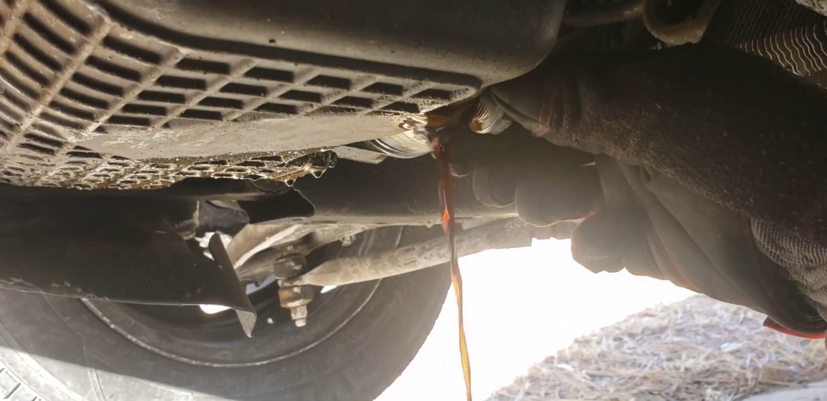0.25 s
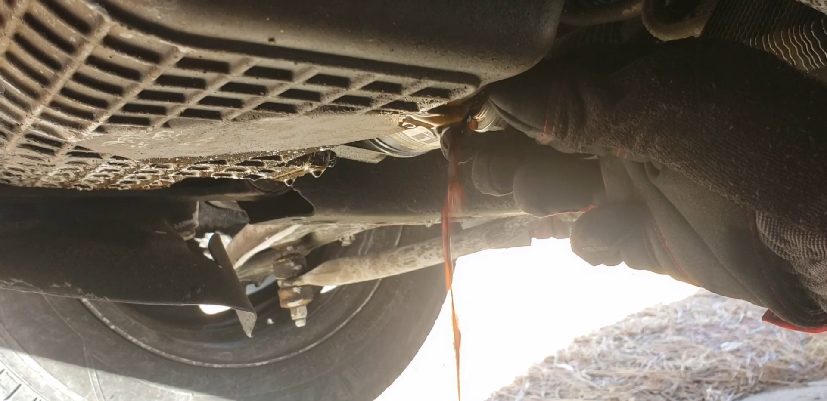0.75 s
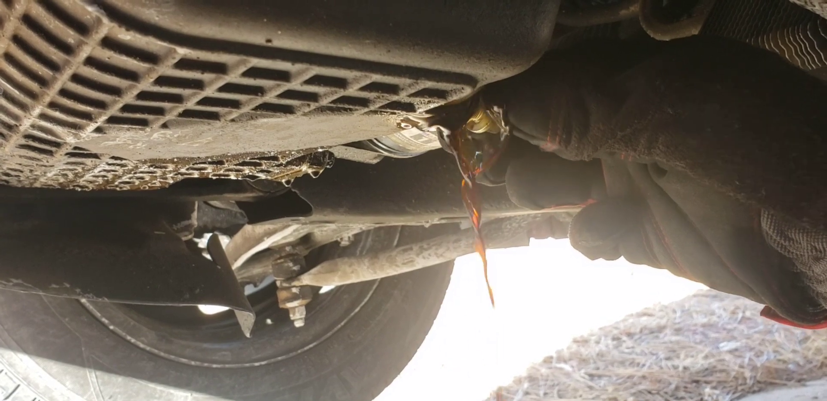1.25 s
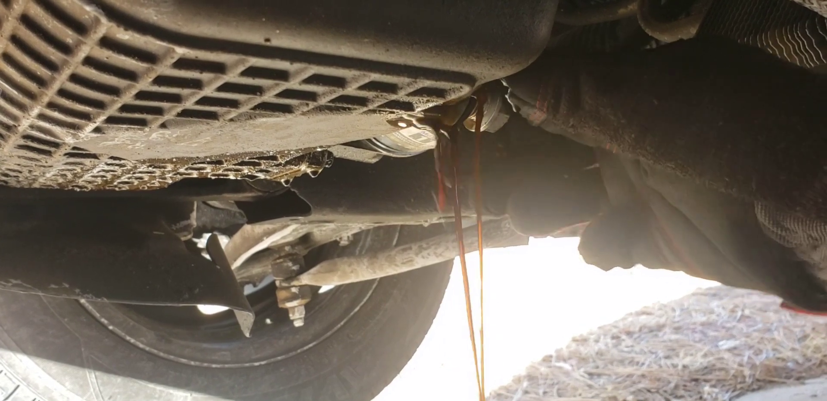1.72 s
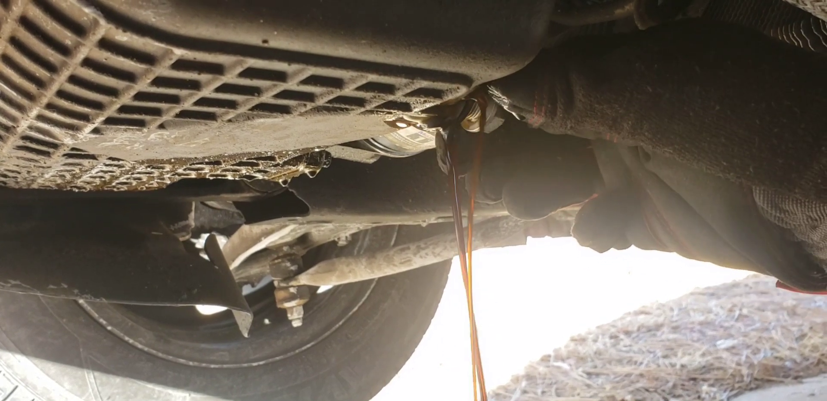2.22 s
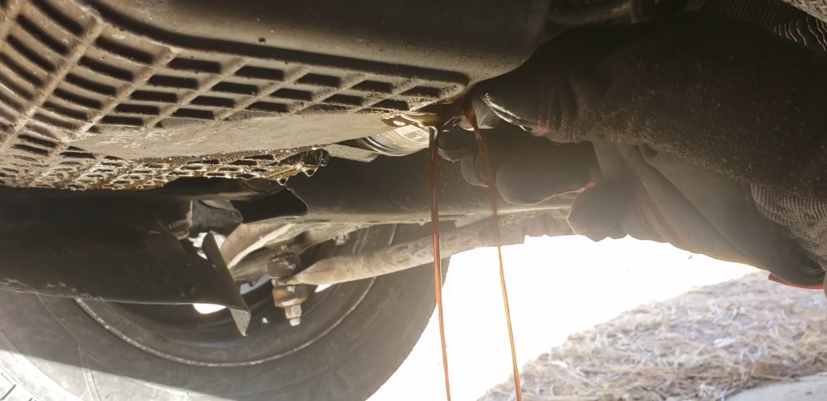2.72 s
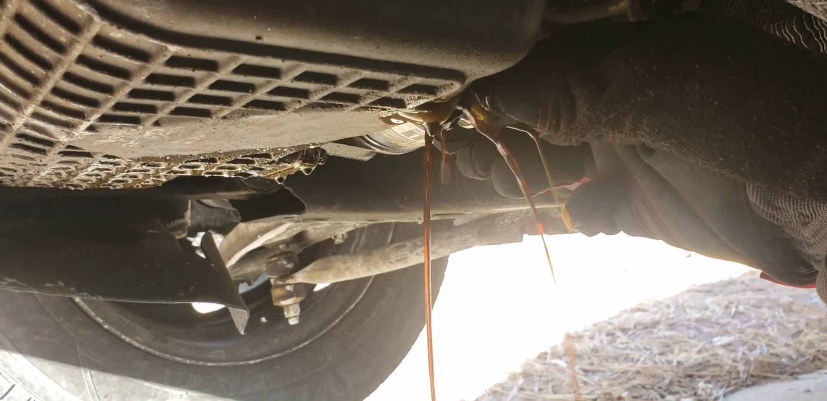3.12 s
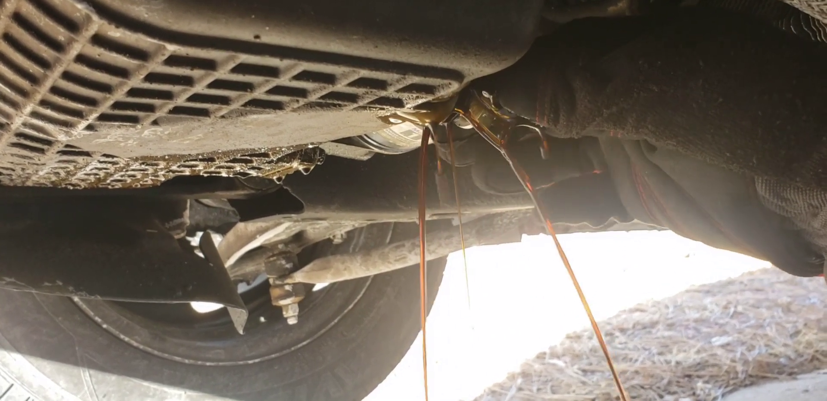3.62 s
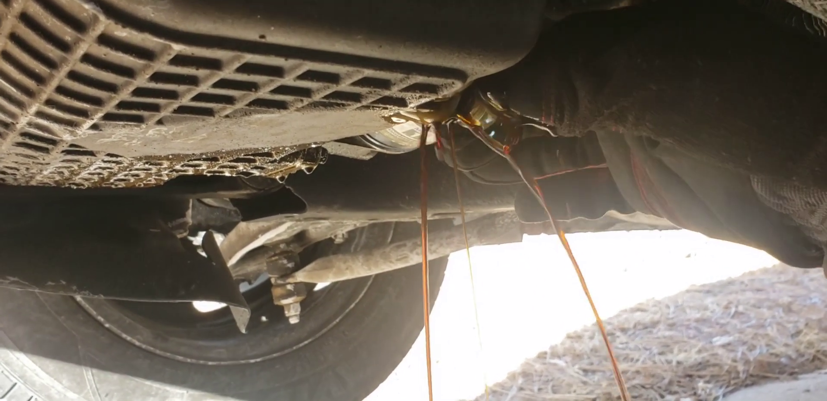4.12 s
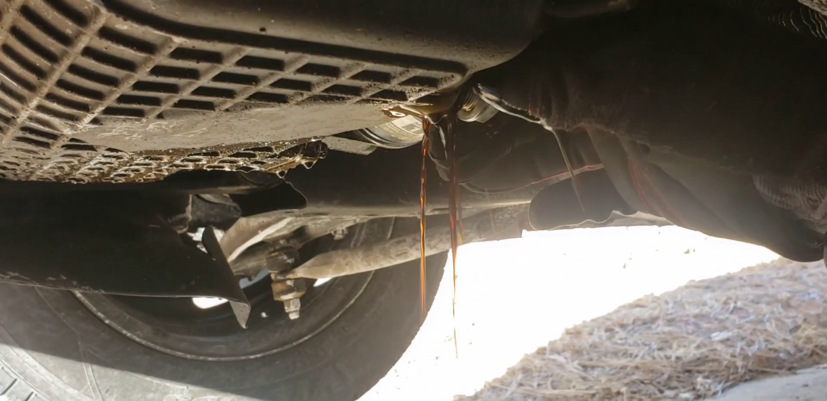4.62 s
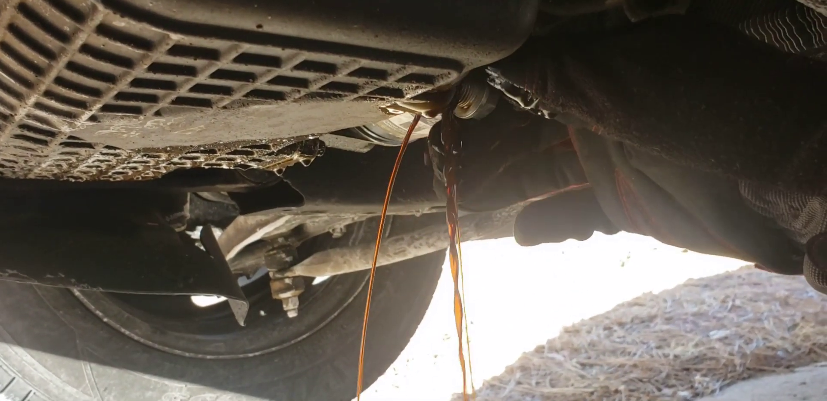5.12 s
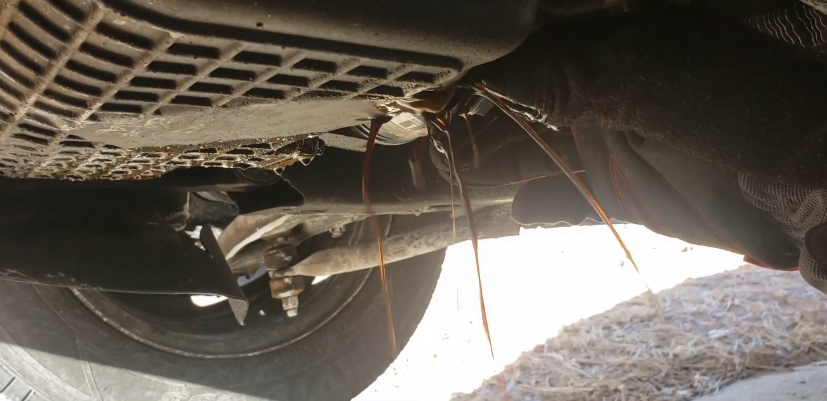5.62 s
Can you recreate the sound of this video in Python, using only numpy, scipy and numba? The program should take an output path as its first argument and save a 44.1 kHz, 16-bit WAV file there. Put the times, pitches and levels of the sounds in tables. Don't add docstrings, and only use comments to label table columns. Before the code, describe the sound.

Bright, ticking splats of draining oil patter into a hollow plastic tray, with low wind buffeting loud at first, softer afterward.

```python
import sys
import numpy as np
from scipy import signal
from scipy.io import wavfile
from scipy.ndimage import uniform_filter1d
from numba import njit

SR = 44100
rng = np.random.default_rng(int(sys.argv[2]) if len(sys.argv) > 2 else 0)


def to_wav(s):
    ch = np.atleast_2d(s).T
    pcm = np.round(np.clip(ch, -1, 1) * 32767)
    wavfile.write(sys.argv[1], SR, pcm.astype(np.int16))


def rack_gain(trim_db):
    fader = np.asarray(trim_db, float)
    return 10 ** (fader / 20)


N = 258101

# (time [s], fine spray [dB], drumming on tray [dB], lean toward tray's hollow [dB],
# left minus right [dB])
FLOW = [(0.0, -50.5, -57.5, -7.5, -9), (0.5, -56, -59.5, -12, -6), (0.72, -52, -64, -2.5, -4),
        (0.91, -55, -57.5, -5.5, -6), (1.4, -55, -70.5, -3, -4), (1.79, -62, -71.5, -2, 0),
        (2.57, -61, -63.5, -3.5, -2.5), (3.19, -58, -65, -19, 0.5), (3.55, -58.5, -64, -2, 1),
        (3.75, -58, -71, 4.5, -2), (4.05, -57, -61, 0.5, -1), (4.22, -56, -60, -4.5, 0.5),
        (4.52, -56.5, -64, -4, 0), (4.8, -56, -69.5, 3, 0.5), (5.3, -56, -63.5, -7.5, -1.5),
        (5.85, -59, -66.5, 3.5, -1)]
# (time [s], peak [dB], centre [Hz], bright crack [dB])
BRIGHT_SPLATS = [(0.0618, -34, 12300, -6), (0.4242, -31, 10500, -10), (0.5157, -32, 13400, -5),
                 (0.5457, -31, 14000, -2), (0.6194, -23.5, 15900, -11), (0.76, -30.5, 12200, -12),
                 (0.9776, -33, 10100, -7), (1.1202, -28.5, 12700, -17), (1.1575, -24, 14900, -10.5),
                 (1.3613, -30, 11500, -4.5), (1.388, -23.5, 13500, -10), (1.568, -35, 10600, -6),
                 (1.644, -32.5, 11700, -4), (1.887, -25.5, 16000, -18.5), (2.091, -36, 12700, -5),
                 (2.2998, -35.5, 11900, 2.5), (3.22, -29, 12150, -14), (3.4504, -33.5, 11800, -2.5),
                 (3.695, -26.5, 13800, -23), (4.0075, -31, 12000, -12), (4.296, -31.5, 11800, 2),
                 (4.3938, -34.5, 10600, -1), (4.6007, -24.5, 10300, -12), (4.812, -33, 13000, -4),
                 (4.913, -27.5, 14000, -9), (4.9528, -28, 11500, -12), (5.4141, -31.5, 8560, -14),
                 (5.477, -26.5, 11900, -4), (5.6478, -20, 14500, -11), (5.747, -36, 13900, 1)]
# (time [s], peak [dB], centre [Hz], bright crack [dB])
FAT_SPLATS = [(0.183, -46, 6400, -22), (0.4574, -38.5, 4280, -12), (0.5847, -41.5, 6120, -5),
              (0.6365, -32, 6260, -13), (0.7072, -35.5, 5460, -3), (0.9915, -32.5, 4530, -17),
              (1.0914, -32.5, 3840, -39), (1.2758, -39.5, 5570, -6), (1.45, -42.5, 6000, 2),
              (1.5207, -43.5, 7000, -4), (1.6001, -37.5, 4840, -21), (1.6914, -42, 5070, -5),
              (1.719, -42, 4200, -11), (1.9949, -37.5, 7100, -18), (2.2207, -42, 7550, -9),
              (2.4902, -44.5, 7950, -5), (2.6953, -42, 6100, -12), (2.7429, -40.5, 4860, -8),
              (3.1063, -47.5, 7940, -9), (3.1991, -47.5, 7000, -1), (3.8062, -46.5, 6900, -5),
              (3.8616, -45.5, 5300, -5), (3.893, -41, 3480, -14), (4.12, -42, 7300, -8),
              (4.145, -45, 8860, -7), (4.201, -62, 8500, -14), (4.78, -53.5, 3170, 9.5),
              (5.018, -39, 3420, -2), (5.2513, -32, 7100, -13), (5.3708, -40, 3440, -15),
              (5.624, -40.5, 3470, -22), (5.7708, -48, 3800, 5)]
# (time [s], peak [dB], centre [Hz])
SMALL_SPLATS = [(0.113, -44, 12600), (0.3354, -39, 6200), (0.6682, -28, 13000), (0.7866, -32, 11700),
                (0.864, -38, 11800), (0.927, -33.5, 12400), (1.03, -35, 10000), (1.2024, -33, 10700),
                (1.228, -33.5, 9600), (1.85, -38.5, 10600), (2.131, -38, 12400), (2.5264, -39, 14900),
                (2.625, -40, 8000), (2.806, -38, 6640), (2.9258, -38, 9700), (3.3414, -36.5, 6770),
                (3.38, -33.5, 12400), (3.544, -34, 13200), (3.606, -37, 10100), (3.987, -36.5, 11680),
                (4.269, -33, 9700), (4.5205, -32.5, 12400), (4.6167, -30.5, 12400), (4.6763, -32, 13700),
                (4.751, -31.5, 11100), (4.936, -31, 11700), (5.063, -36.5, 5430), (5.2083, -32, 12700),
                (5.456, -33, 11900), (5.704, -32, 4330)]
# (time [s], peak [dB], centre [Hz])
MORE_SMALL_SPLATS = [(0.1956, -38, 7840), (0.2199, -40, 13500), (0.353, -41, 4160), (2.0293, -46, 13400),
                     (2.0487, -43, 12000), (2.1905, -46, 13400), (2.2762, -53, 5030), (0.2818, -57, 11000),
                     (0.5726, -43, 6130), (0.7302, -32, 10100), (0.8824, -37, 11600), (1.262, -51, 5400),
                     (1.4296, -38, 5640), (2.3457, -40.5, 5030), (2.396, -45, 12400), (2.4663, -47, 10000),
                     (2.5985, -49, 8130), (3.1328, -33.5, 13100), (3.2894, -44, 12150), (3.477, -34.5, 12700),
                     (3.4925, -37, 10200), (3.7439, -42, 12700), (3.8173, -33.5, 12400), (3.923, -36.5, 5500),
                     (4.0622, -36.5, 10400), (4.1639, -40, 7050), (4.2144, -48, 12800), (4.4423, -34, 7300),
                     (4.4735, -32.5, 12400), (4.8947, -34.5, 5350), (4.9741, -32.5, 12400), (5.1944, -48, 12600),
                     (5.3138, -58, 12500), (5.5433, -40, 12900), (5.563, -41, 13900), (5.6027, -38, 14600)]
# (frequency [Hz], density [dB per Hz])
SPRAY_COLOUR = [
    (1470, -32),
    (2800, -44),
    (3360, -5.5),
    (3860, -12.5),
    (7080, -7),
    (8660, -17),
    (13300, -4),
    (16000, -35),
]
# (time [s], half length [s], depth [dB])
LULLS = [(1.314, 0.041, -4), (1.497, 0.0089, -9), (1.862, 0.034, -8.5), (2.35, 0.037, -3), (3.7, 0.006, -2),
         (2.9, 0.0086, -4), (4.822, .006, -11), (5.492, .012, 0), (0.47, 0.0068, -8), (0.06, 0.0087, -4),
         (0.56, 0.0049, -3), (2.5, 0.0057, -3), (2, 0.0073, -5.5), (3.466, 0.068, -5), (4.1, 0.026, -4),
         (2.6, 0.01, 1.5), (4.793, 0.016, -5.5), (4.85, 0.065, -4), (5.741, 0.0032, -14)]
# (frequency [Hz], width [Hz], level [dB])
TRAY_MODES = [
    (575, 55, 0),
    (1290, 98, -8),
    (1624, 90, -10.5),
    (1870, 67, -5.5),
    (2370, 54, -17),
]
# (time [s], peak [dB], pitch [Hz])
KNOCKS = [(0.0615, -48, 2010), (0.5162, -42.5, 1700), (0.637, -42, 1900), (0.8836, -38, 1570),
          (0.9915, -40, 1780), (1.1592, -48.5, 1747), (1.4306, -46.5, 1780), (1.4545, -42.5, 1850),
          (1.5205, -44, 1810), (1.6451, -43, 2000), (1.8866, -41, 3000), (2.0502, -48, 1780),
          (2.773, -41, 1870), (3.1243, -45, 2480), (3.1692, -45, 1650), (3.247, -47, 1300),
          (3.5643, -43, 1870), (3.6084, -46, 1830), (4.5466, -49, 1930), (4.6841, -43.5, 2370),
          (4.78, -42.5, 2320), (4.9546, -41, 2420), (5.018, -45, 1870), (5.1114, -37, 2570),
          (5.1542, -45, 2870), (5.2165, -41.5, 1870), (5.3953, -47, 1780), (5.6057, -40.5, 1810),
          (5.7469, -36, 1870), (5.7696, -32, 1890)]
# (time [s], peak [dB], pitch [Hz])
SOFT_KNOCKS = [(0.2828, -48, 1790), (0.403, -43, 1790), (0.4444, -45, 1880), (0.5886, -38.5, 2690),
               (0.8345, -45, 1420), (0.9243, -40, 1750), (1.2544, -46, 2094), (1.3598, -48, 1870),
               (2.169, -52, 1150), (2.2218, -52, 1436), (2.2752, -49.5, 1750), (2.4029, -49, 1880),
               (2.4653, -46, 1880), (2.6364, -46.5, 1320), (2.6793, -55, 2720), (2.7187, -42.5, 1670),
               (2.7367, -45.5, 1870), (2.8464, -46.5, 1790), (3.023, -50, 1360), (3.1996, -47.5, 1250),
               (3.2244, -41.5, 1870), (3.2834, -45.5, 1290), (3.3418, -45.5, 1790), (3.4486, -46, 2300),
               (3.4685, -46, 1820), (3.6531, -46, 2350), (3.698, -52, 1880), (3.8442, -48, 1770),
               (3.9175, -43, 1870), (4.1954, -42.5, 2028), (4.2652, -46.5, 1180), (4.342, -48, 1290),
               (4.5614, -44, 2380), (4.6279, -49.5, 1850), (4.6553, -46, 2110), (4.7501, -44.5, 1690),
               (4.8733, -43, 2800), (5.1956, -46, 1760), (5.2565, -42, 1780), (5.3532, -52, 1850),
               (5.4291, -41.5, 1320), (5.5423, -51, 1780), (5.5694, -43.5, 1880), (5.6411, -45, 1950),
               (5.7204, -42.5, 1930)]
# (time [s], peak [dB], pitch [Hz])
THUDS = [(0.001, -41.5, 900), (0.027, -51, 915), (0.136, -52, 905), (0.172, -49.5, 920), (0.196, -47, 940),
         (0.24, -44, 527), (0.241, -48, 920), (0.352, -54, 905), (0.403, -54, 900), (0.264, -55, 880),
         (0.294, -49.5, 965), (0.319, -47.5, 920), (0.364, -48, 1000), (0.56, -44, 900), (1.65, -52, 970),
         (1.743, -55.5, 900), (2.17, -49, 870), (2.172, -48, 600), (2.405, -57, 560), (2.442, -51, 603),
         (2.559, -47.5, 595), (2.59, -52, 587), (2.615, -48.5, 910), (2.616, -45, 600), (2.72, -55, 587),
         (2.857, -57, 573), (3.621, -44, 583), (3.733, -51, 575), (3.789, -48, 585), (3.837, -50, 580),
         (3.89, -49.5, 604), (3.933, -43.5, 604), (4.014, -45, 580), (4.06, -44, 575), (4.123, -37, 567),
         (4.148, -42, 595), (4.304, -40.5, 580), (4.353, -44.5, 556), (4.407, -42.5, 587),
         (4.517, -41, 573)]
# (time [s], peak [dB], pitch [Hz])
PLINKS = [(1.048, -41, 4200), (1.1583, -37.5, 3880), (1.3603, -40, 4160), (1.5648, -47.5, 3600),
          (2.3012, -43, 4970), (2.5471, -50, 3700), (2.6634, -49, 3350), (2.695, -44, 2790),
          (3.029, -59, 2730), (3.2196, -43, 3270), (4.0282, -47, 3460), (4.1264, -48, 3260),
          (4.5994, -42.5, 4100), (4.6344, -47, 4670), (4.896, -44.5, 4230), (4.9352, -49, 3500),
          (4.9891, -42, 4200), (5.1554, -41, 3270), (5.1894, -53, 4440), (5.4131, -39.5, 3550),
          (5.5857, -40.5, 3400), (5.7884, -40, 3800), (5.8444, -46.5, 3250)]
# (time [s], length [s], first pitch [Hz], last pitch [Hz], level [dB])
WHISTLES = [
    (0.062, 0.025, 1850, 2250, -47.5),
    (0.81, .045, 990, 1450, -57),
    (0.9, 0.24, 2000, 1400, -63),
    (1.5, 0.065, 1460, 1330, -60),
    (1.272, .035, 1290, 1450, -62),
    (4.552, 0.028, 1900, 2900, -56),
    (5.108, 0.011, 4700, 2700, -47),
    (5.545, 0.025, 1220, 1500, -53),
    (4.3, 0.021, 2100, 1600, -54),
]
# (frequency [Hz], width [Hz], level [dB])
WIND_MODES = [
    (66.6, 61, 10),
    (91, 124, -0.5),
    (145, 130, -9),
]
# (time [s], level [dB])
BREEZE = [(0.0, -44), (0.5, -43.5), (1.07, -40), (1.54, -45), (1.65, -42.5), (1.8, -47), (2.11, -42.5),
          (2.5, -48), (3.2, -50), (3.47, -47), (3.7, -50), (3.98, -46), (4.32, -46.5), (4.83, -45.5),
          (5.85, -44.5)]
# (time [s], level [dB])
GUST = [(0.0, -36.5), (0.3, -42.5), (0.42, -41.5), (0.6, -42), (0.85, -32), (0.98, -41.5), (1.15, -33),
        (1.35, -27.5), (1.55, -23)]
# (time [s], peak [dB], half length [s])
EDDIES = [(0.435, -32, 0.014), (0.494, -26.5, 0.0062), (0.525, -25.5, 0.0085), (0.594, -27, 0.017),
          (0.668, -27.5, 0.038), (0.744, -23.5, 0.022), (0.83, -26.5, 0.017), (0.889, -21.5, 0.026),
          (1.103, -18.5, 0.0086), (1.168, -26.5, .012), (1.194, -25, 0.0089), (1.238, -18, 0.013),
          (1.282, -21, 0.01), (1.328, -15, 0.012), (1.359, -17, 0.0093), (1.431, -15, 0.012),
          (1.458, -17.5, 0.011), (1.498, -19.5, 0.015), (1.54, -14.5, 0.011), (3.395, -45, 0.031),
          (3.484, -46, 0.086), (3.965, -45, 0.088), (4.33, -49.5, 0.039), (4.405, -46, 0.018),
          (4.72, -44, 0.037), (5.073, -44, 0.017), (5.377, -44, 0.047), (5.817, -44.5, 0.035)]
# (time [s], peak [dB])
PUFFS = [
    (1.751, -61),
    (2.234, -62),
    (2.436, -49),
    (2.549, -60),
    (2.826, -69),
    (3.051, -66),
]
# (time [s], peak [dB], pitch [Hz])
POP = (1.4622, -12.5, 327)
# (time [s], level [dB])
ROAD = [
    (0, -63),
    (3.2, -74),
    (3.7, -62.5),
    (4.3, -63),
    (5.85, -64.5),
]

GUST_ENDS_S, GUST_RELEASE_S = 1.545, 0.0017


@njit
def svf(x, hz, width):
    y, b, l = np.empty(len(x)), 0., 0.
    g, k = np.tan(np.pi * hz / SR), width / hz
    for i in range(len(x)):
        v = (b + g * (x[i] - l)) / (1 + g * (g + k))
        b, l, y[i] = 2 * v - b, l + 2 * g * v, k * v
    return y


@njit
def bursts(noise, start, hz, width, fade_s, left, right, snap, glide):
    out = np.zeros((2, len(noise)))
    for e in range(len(start)):
        g, k, b, l = np.tan(np.pi * hz[e] / SR), width[e] / hz[e], 0., 0.
        size, fade = np.sqrt(SR / width[e] / 4), np.exp(-1 / (fade_s * SR))
        first, tick = int(start[e] * SR), snap * np.sqrt(fade_s * SR)
        last = min(len(noise), first + int(SR * (7 * fade_s + 2 / width[e])))
        for i in range(first, last):
            v = (b + g * (size * (noise[i] + tick) - l)) / (1 + g * (g + k))
            b, l = 2 * v - b, l + 2 * g * v
            size, tick, g = size * fade, 0., g * (1 + glide / SR)
            out[0, i] += left[e] * k * v
            out[1, i] += right[e] * k * v
    return out


def drops(s, db, hz, sharp, fade_s, pan_db, snap=.4, glide=0.):
    hz = np.clip(hz + 0 * s, 40, .4 * SR)
    left, right = rack_gain(db + pan_db / 2), rack_gain(db - pan_db / 2)
    noise = rng.standard_normal(N)
    return bursts(noise, s, hz, hz / sharp, fade_s, left, right, float(snap), float(glide))


def unit(x):
    return x / np.sqrt(np.mean(x ** 2))


def even(x, span_s):
    k = int(span_s * SR)
    power = uniform_filter1d(uniform_filter1d(x ** 2, k), k)
    return x / np.sqrt(power + 1e-9)


def low(x, hz):
    return signal.sosfilt(signal.butter(4, hz, fs=SR, output="sos"), x)


def curves(table):
    s, *columns = np.transpose(table)
    return [np.interp(np.arange(N) / SR, s, c) for c in columns]


def walk(rate):
    k = int(SR / rate)
    held = np.repeat(rng.standard_normal(N // k + 1), k)
    return uniform_filter1d(uniform_filter1d(held, k), k)[:N]


def under_car(x, t60_s, wet_db, count=4):
    t = np.arange(int(.09 * SR)) / SR
    place = np.array([walk(6) for _ in range(count)]).argmax(axis=0)
    out = np.array([np.roll(x[0], 3), x[1]])
    for k in range(count):
        echo = rng.standard_normal((2, len(t))) * rack_gain(-60 * t / t60_s) * np.minimum(t / 0.00053, 1)
        echo = echo / np.sqrt(np.sum(echo ** 2, axis=1, keepdims=True))
        out = out + rack_gain(wet_db) * signal.fftconvolve(x * (place == k), echo, axes=1)[:, :N]
    return out


def splats():
    bright = [(s, db + 2, hz, top_db) for s, db, hz, top_db in BRIGHT_SPLATS]
    fat = [(s, db + 9.0, hz, top_db) for s, db, hz, top_db in FAT_SPLATS]
    small = [(s, db + 1.5, hz, -6) for s, db, hz in SMALL_SPLATS + MORE_SMALL_SPLATS]
    s, db, hz, top_db = np.vstack([bright, fat, small]).T
    pan_db = np.interp(s, np.array(FLOW)[:, 0], np.array(FLOW)[:, -1])
    fade_s = .0017
    core = drops(s, db - 9.5, hz, 6.7, fade_s, pan_db)
    crack = drops(s, db + top_db - 3.0, 12000, 1.0, fade_s, pan_db)
    broad = drops(s, db - 21.0, 5500, 6.0, fade_s, pan_db)
    return under_car(core + crack + broad, t60_s=.04, wet_db=5.5)


def spray(count):
    spray_db = curves(FLOW)[0]
    when, pitch, size, side = rng.random((count, 4)).T
    s = when * (N - 1) / SR
    hz = 2600 * 6.0 ** pitch
    colour_hz, density_db = np.transpose(SPRAY_COLOUR)
    colour_db = np.interp(np.log(hz), np.log(colour_hz), density_db) + 10 * np.log10(hz)
    size_db = -1.5 * np.log(1 - .96 * size)
    fine = drops(s, colour_db + size_db, hz, 6.1, .0014, 6 * (side - .5) - 1.2)
    return unit(under_car(fine, t60_s=.045, wet_db=5)) * rack_gain(spray_db + 3.5 + 1.0 * walk(9.7))


def mist():
    common = rng.standard_normal(N)
    hiss = [unit(svf(common + 1.8 * rng.standard_normal(N), 12700.0, 8100.0)) for _ in range(2)]
    return np.array(hiss) * rack_gain(curves(FLOW)[0] - 7)


def patter(count, spread_db):
    when, size = rng.random((count, 2)).T
    size_db = -spread_db * np.log(1 - .95 * size)
    return drops(when * (N - 1) / SR, size_db, 1500, 0.87, 0.0013, 0)[0]


def blips(count, lo_hz, hi_hz, sharp):
    when, pitch, size = rng.random((count, 3)).T
    hz = lo_hz * (hi_hz / lo_hz) ** pitch
    size_db = -3.0 * np.log(1 - .93 * size)
    return unit(drops(when * (N - 1) / SR, size_db, hz, sharp, 0.0021, 0, snap=0.18, glide=5.2)[0])


def wall_modes(x):
    return sum(rack_gain(g) * svf(x, float(f), float(w)) for f, w, g in TRAY_MODES[1:])


def tray_knocks():
    s, db, hz = np.vstack([KNOCKS, np.subtract(SOFT_KNOCKS, (0, 2.5, 0))]).T
    knocks = drops(s, db + 2.0, hz, 5.7, 0.0027, -1.5, snap=0.72, glide=2.5)
    knocks = knocks + drops(s, db - 1.0, 1.5 * hz, 0.9, 0.0015, -1.5)
    return knocks + 0.8 * wall_modes(knocks[0])


def tray_thuds():
    s, db, hz = np.transpose(THUDS)
    on_floor = hz > 700
    ring = drops(s, db - 5 - 60 * on_floor, hz, 11, .002, 0, snap=2)[0]
    slap = drops(s, db + 1 - 60 * ~on_floor, hz, 6, .0015, 3, snap=2)
    overtone_hz = np.where(on_floor, 1.41, 2.24) * hz
    slap = slap + 0.48 * drops(s, db + 6.5 - 8 * ~on_floor, overtone_hz, 6.7, 0.0021, 1.7, snap=2.3)
    return ring, low(np.array([np.roll(slap[0], 9), slap[1]]), hz=1880)


def tray(count):
    _, wall_db, lean_db, _ = curves(FLOW)
    hollow_db = wall_db + lean_db
    floor_db = wall_db - 5.5 - 0.86 * np.arange(N) / SR
    air_hz, air_width = float(TRAY_MODES[0][0]), float(TRAY_MODES[0][1])
    ring, slap = tray_thuds()

    hollow = svf(svf(patter(2 * count, 3.5), air_hz, 1.5 * air_width), air_hz, 210.0)
    hollow = unit(hollow) * rack_gain(hollow_db + 2.5)
    hollow = hollow + svf(blips(count, lo_hz=303, hi_hz=600, sharp=5.0), 413.0, 280.0) * rack_gain(-67.5)
    hollow = hollow + svf(ring, air_hz, 135.0)
    boom = np.array([np.roll(hollow, 6) * rack_gain(-1.5), hollow])

    floor = blips(count, lo_hz=733, hi_hz=975, sharp=11.0) * rack_gain(floor_db + 8.5)
    floor = np.array([np.roll(floor, 10), floor])

    wall = unit(wall_modes(patter(count, 8.4)))
    wall = (wall + 1.13 * blips(count, lo_hz=1460, hi_hz=3000, sharp=3.0)) * rack_gain(wall_db + 1.5)
    gurgle = [blips(2 * count, lo_hz=1480, hi_hz=2040, sharp=7.0)
              + 0.59 * blips(count, lo_hz=600, hi_hz=1080, sharp=5.) for _ in range(2)]
    wall = wall + np.array(gurgle) * rack_gain(wall_db - 2.5)
    struck = under_car(floor + wall + tray_knocks() + slap, t60_s=0.086, wet_db=0.7)
    return boom + 0.37 * slap + struck * rack_gain(-5.5)


def lull():
    t = np.arange(N) / SR
    return rack_gain(sum(db * np.exp(-.5 * ((t - s) / half_s) ** 2) for s, half_s, db in LULLS))


def plinks():
    s, db, hz = np.transpose(PLINKS)
    return under_car(drops(s, db, hz, 14.0, 0.0025, -1.5, glide=3.7), t60_s=0.07, wet_db=2.5)


def whistles():
    t, out = np.arange(N) / SR, 0
    for s, length_s, first_hz, last_hz, db in WHISTLES:
        part = np.clip((t - s) / length_s, 0, 1)
        hz = (first_hz + (last_hz - first_hz) * part) * (1 + 0.014 * walk(60.))
        swell = rack_gain(db + 4.0 * walk(70.)) * np.sin(np.pi * part) ** .5
        out = out + swell * np.sin(2 * np.pi * np.cumsum(hz) / SR)
    return np.array([0.66 * out, out])


def right_wind_db():
    t = np.arange(N) / SR
    held = np.clip(1 - (t - GUST_ENDS_S) / GUST_RELEASE_S, 0, 1)
    power = (held * rack_gain(curves(GUST)[0])) ** 2
    hushed = (t > 1.6) & (t < 3.2)
    power = power + rack_gain(-67 - 37 * hushed) ** 2
    for s, db, half_s in EDDIES:
        eddy = rack_gain(db) * np.exp(-.5 * ((t - s) / half_s) ** 2)
        power = power + (eddy * (held if s < GUST_ENDS_S else 1)) ** 2
    return 10 * np.log10(power)


def port_wind(air, port_db, rough_db):
    body = 0
    for f, w, g in WIND_MODES:
        body = body + rack_gain(g) * unit(svf(svf(air, float(f), 0.99 * w), float(f), 0.99 * w))
    edge = unit(svf(svf(air, 236.0, 95.0), 219.0, 340.0))
    rumble = low(rack_gain(port_db) * even(body, 0.11), hz=199)
    rough = low(edge * rack_gain(port_db + rough_db + 4.2 * walk(30)), hz=475)
    return rumble + rough + rack_gain(port_db - 40.5) * unit(svf(air, 670.0, 510.0))


def gust_slaps():
    s, puff_db = np.transpose(PUFFS)
    puffs = low(drops(s, puff_db, 85, 2.7, 0.0027, 0, snap=2.1)[1], hz=240)
    s, db, hz = POP
    t = np.arange(N) / SR - s
    pop = np.cos(2 * np.pi * hz * t) * np.exp(-(t / np.where(t < 0, .0007, .0021)) ** 2)
    return puffs + low(rack_gain(db) * pop, hz=1210)


def wind():
    left_db, right_db = curves(BREEZE)[0] + 2.44 * walk(16), right_wind_db()
    gust_edge_db = -19 + 0.22 * (np.maximum(right_db, -40) + 24.5)
    edge_floor_db = -75.5 - right_db
    edge_db = 10 * np.log10(rack_gain(gust_edge_db) ** 2 + rack_gain(edge_floor_db) ** 2)
    common = rng.standard_normal(N)
    share = np.clip(.5 * rack_gain(-35.5 - right_db), 0, .6)
    ports = []
    for port_db, rough_db in ((left_db, -15.5), (right_db, edge_db)):
        turbulence = np.sqrt(share) * common + np.sqrt(1 - share) * rng.standard_normal(N)
        ports.append(port_wind(turbulence, port_db, rough_db))
    ports[1] = ports[1] + gust_slaps()
    return np.array(ports)


def road():
    common = rng.standard_normal(N)
    hum = []
    for _ in range(2):
        noise = common + .5 * rng.standard_normal(N)
        hum.append(unit(svf(svf(noise, 275.0, 246.0), 273.0, 266.0)))
    return np.array(hum) * rack_gain(curves(ROAD)[0])


def air():
    return rack_gain(-80) * np.array([unit(svf(rng.standard_normal(N), 1740.0, 21000.0)) for _ in range(2)])


def scene():
    tray_pan = rack_gain(np.array([[-1.2], [1.2]]))
    oil = spray(count=3000) + mist() + tray_pan * tray(count=650)
    return splats() + lull() * oil + plinks() + whistles() + wind() + road() + air()


def band_limit(x):
    return signal.sosfilt(signal.butter(12, 16300, fs=SR, output="sos"), x)


def record(dry):
    trimmed = signal.sosfilt(signal.butter(2, 30, "high", fs=SR, output="sos"), dry)
    trimmed = signal.sosfilt(signal.ellip(8, 1, 32, 15850, fs=SR, output="sos"), trimmed)
    return band_limit(trimmed)


dry = scene()
out = record(dry)
to_wav(out)
```